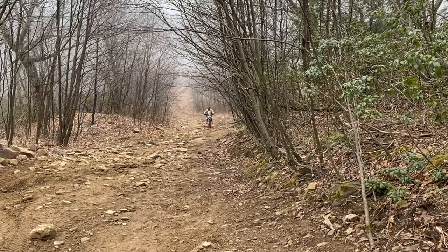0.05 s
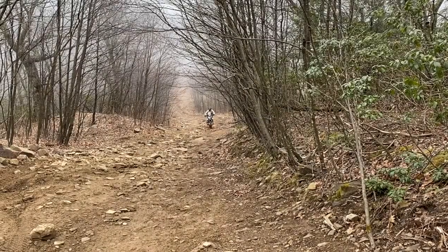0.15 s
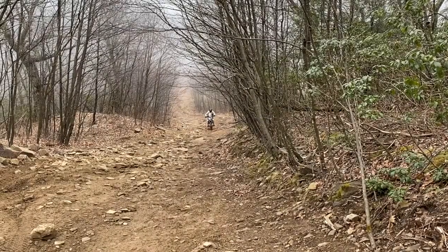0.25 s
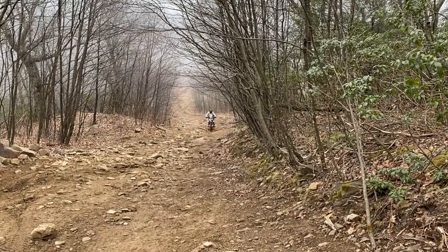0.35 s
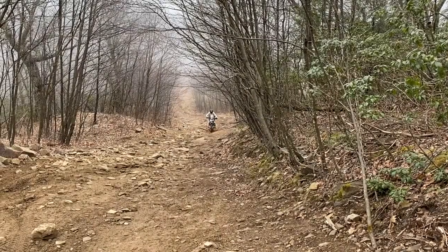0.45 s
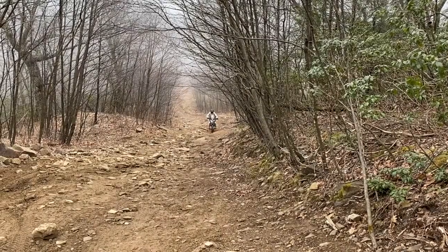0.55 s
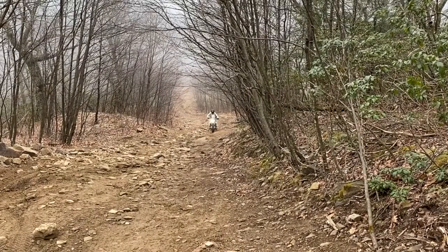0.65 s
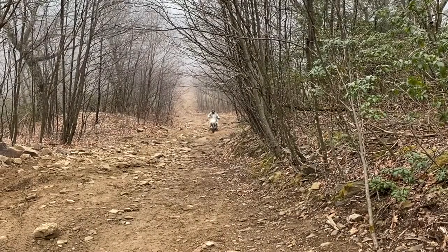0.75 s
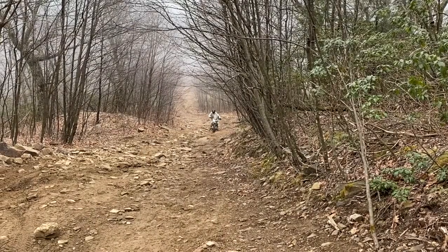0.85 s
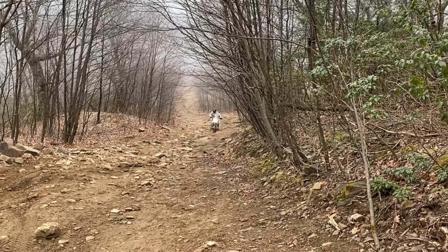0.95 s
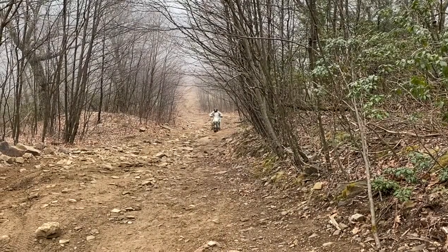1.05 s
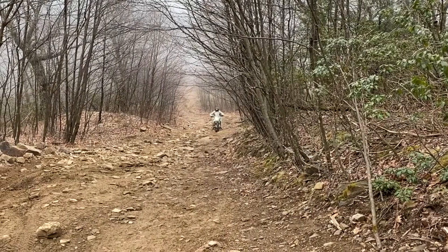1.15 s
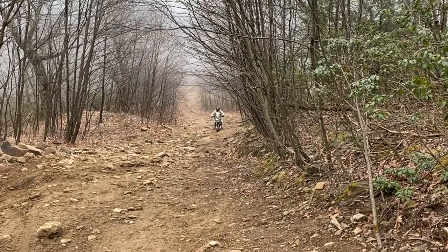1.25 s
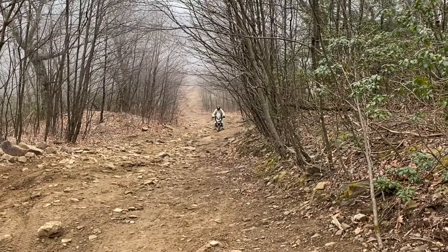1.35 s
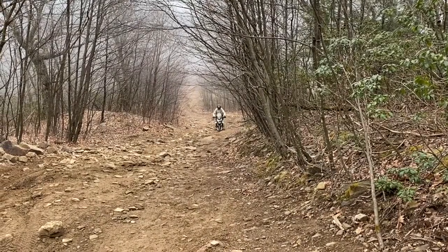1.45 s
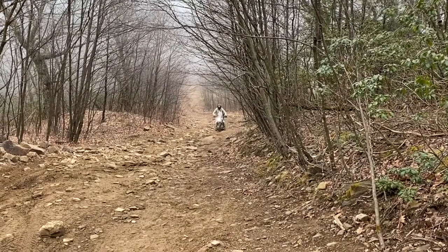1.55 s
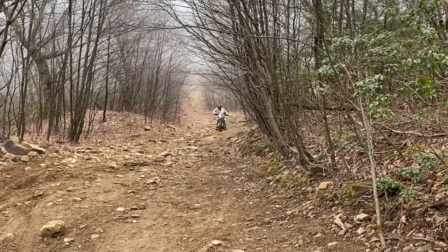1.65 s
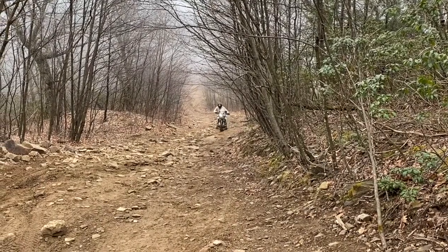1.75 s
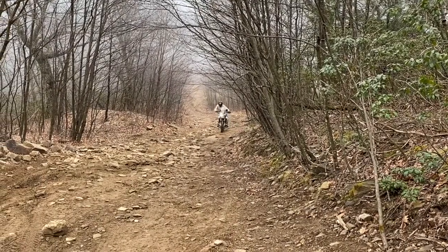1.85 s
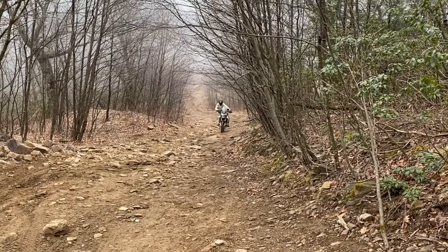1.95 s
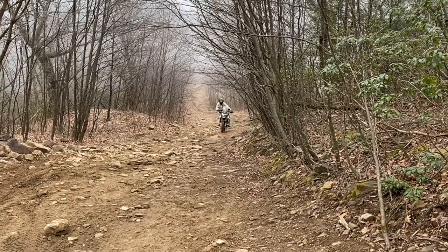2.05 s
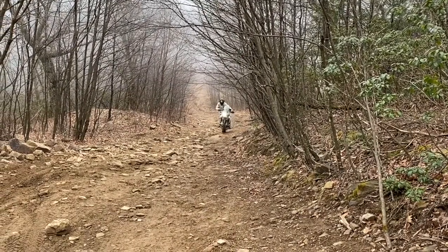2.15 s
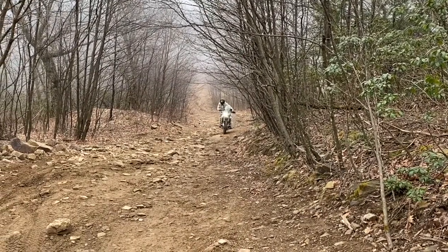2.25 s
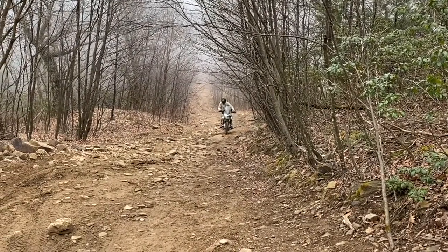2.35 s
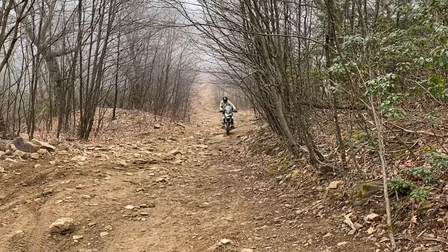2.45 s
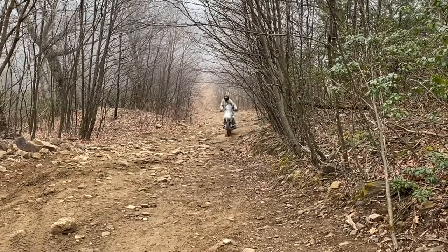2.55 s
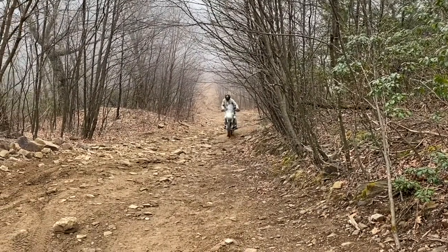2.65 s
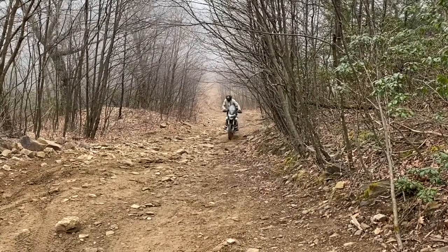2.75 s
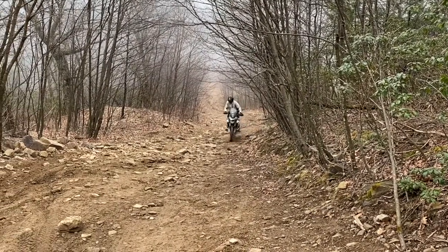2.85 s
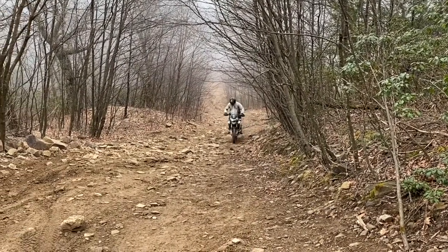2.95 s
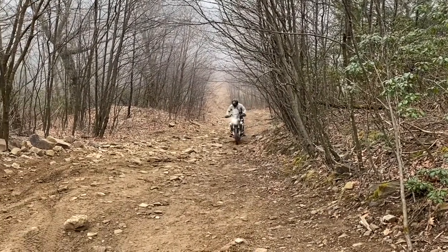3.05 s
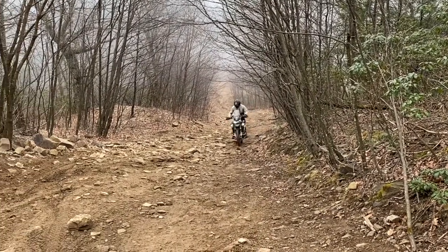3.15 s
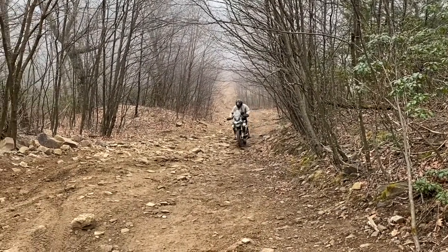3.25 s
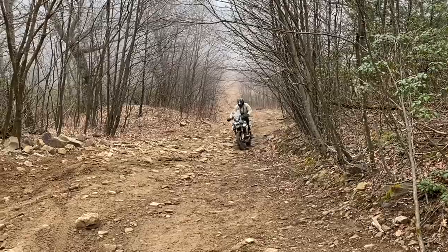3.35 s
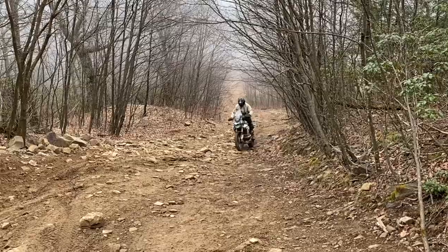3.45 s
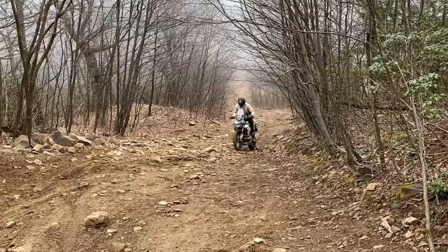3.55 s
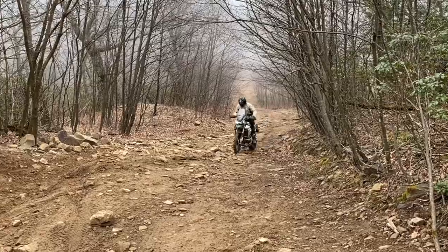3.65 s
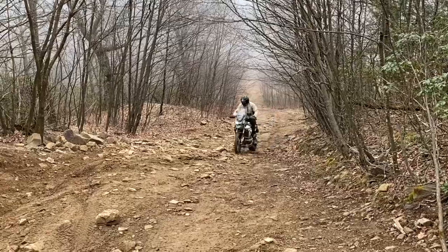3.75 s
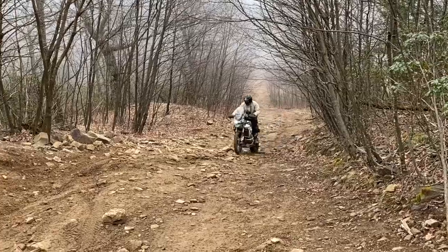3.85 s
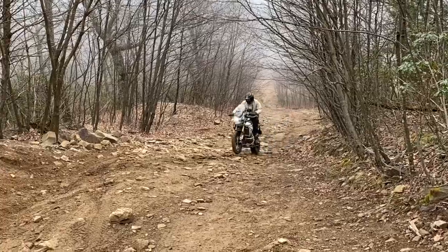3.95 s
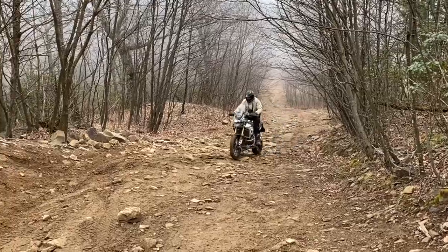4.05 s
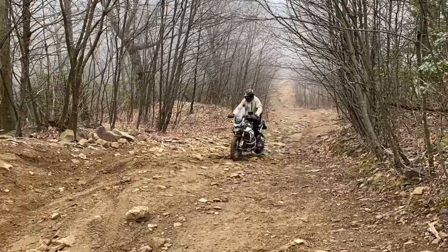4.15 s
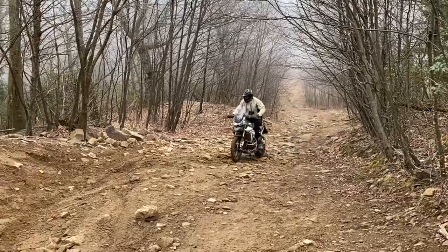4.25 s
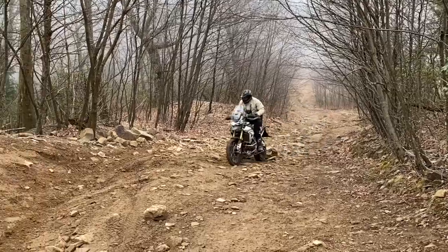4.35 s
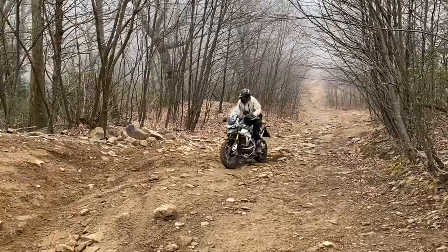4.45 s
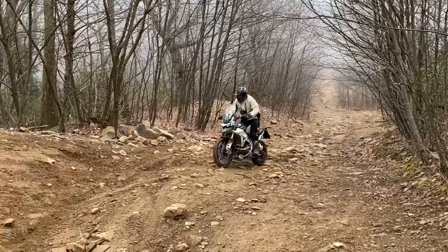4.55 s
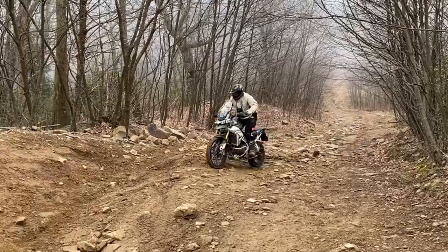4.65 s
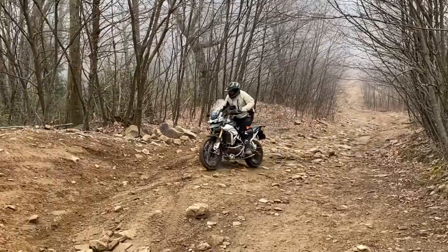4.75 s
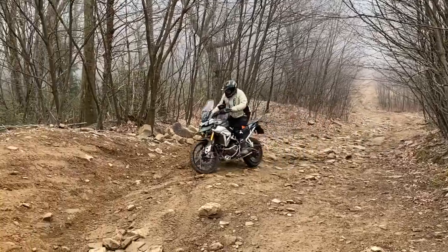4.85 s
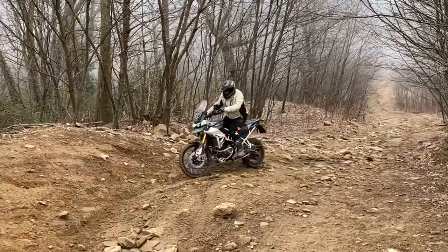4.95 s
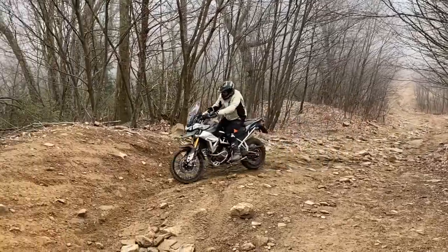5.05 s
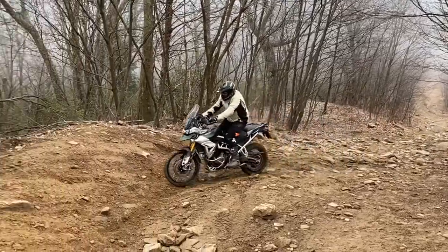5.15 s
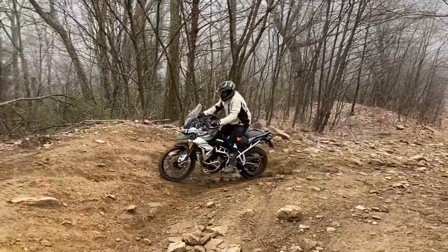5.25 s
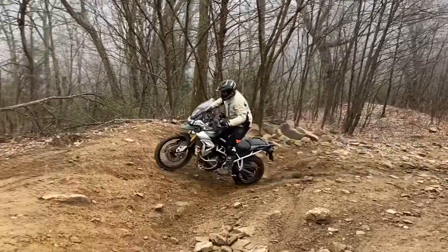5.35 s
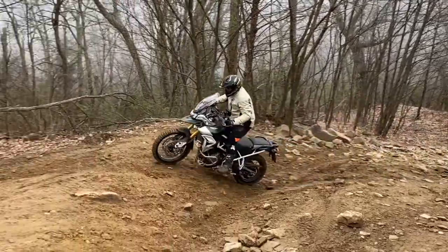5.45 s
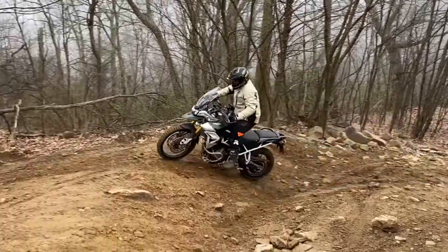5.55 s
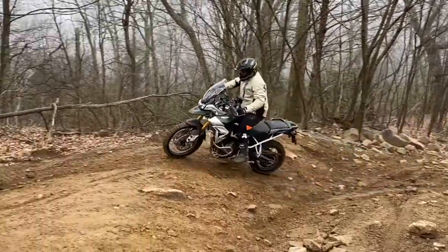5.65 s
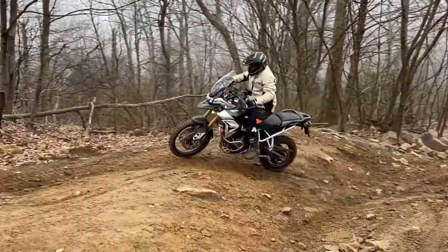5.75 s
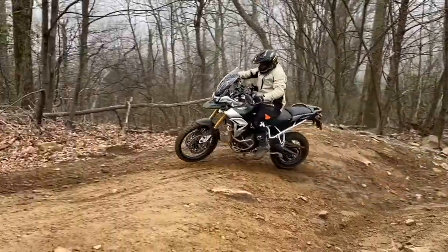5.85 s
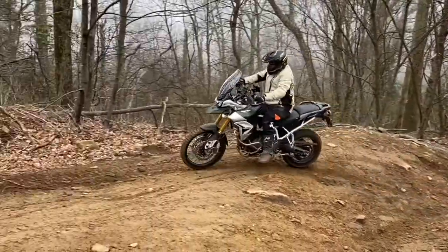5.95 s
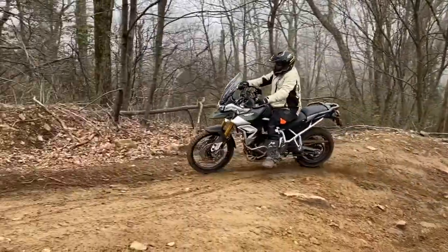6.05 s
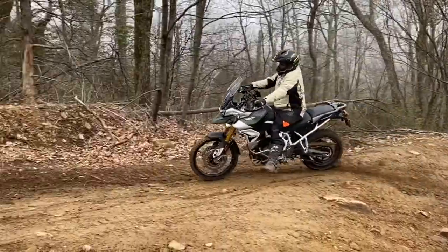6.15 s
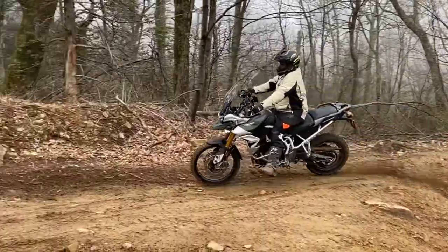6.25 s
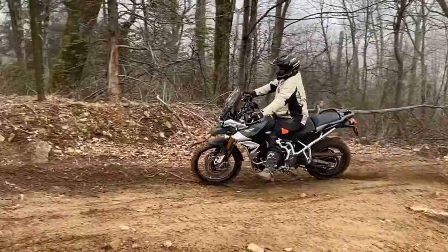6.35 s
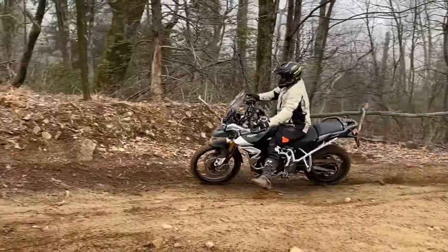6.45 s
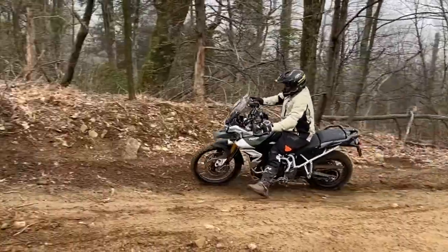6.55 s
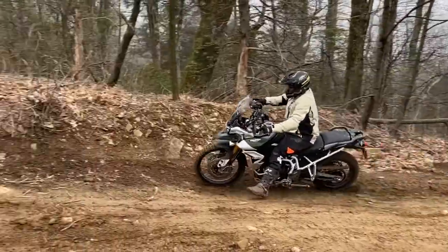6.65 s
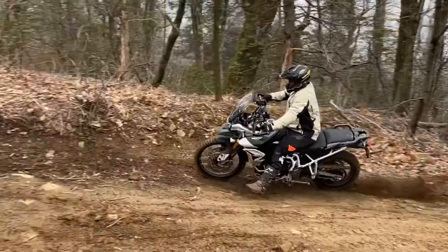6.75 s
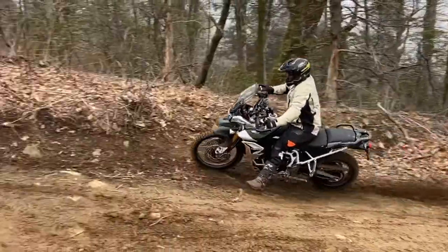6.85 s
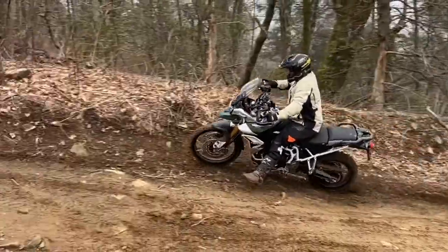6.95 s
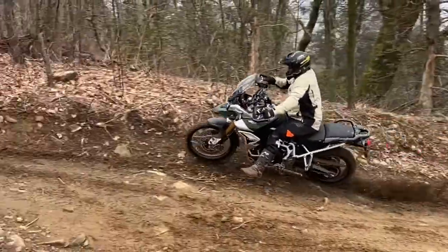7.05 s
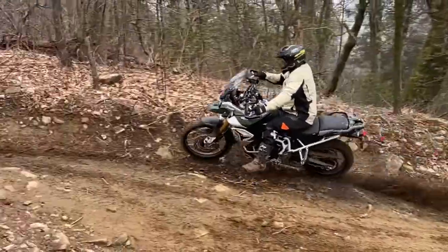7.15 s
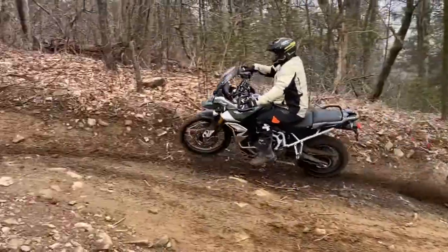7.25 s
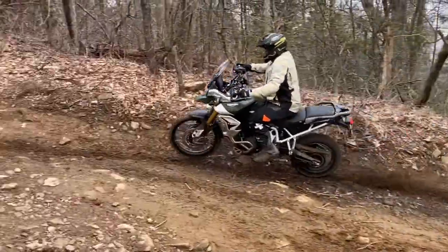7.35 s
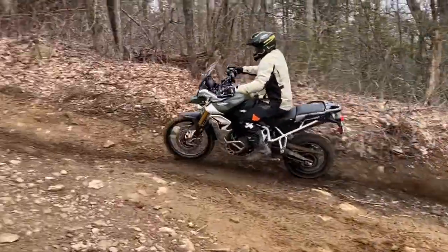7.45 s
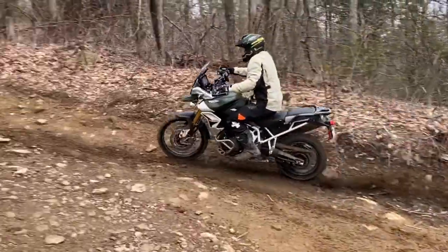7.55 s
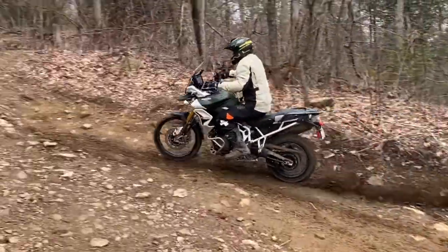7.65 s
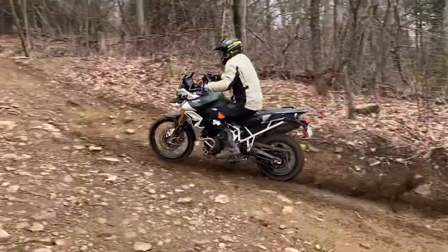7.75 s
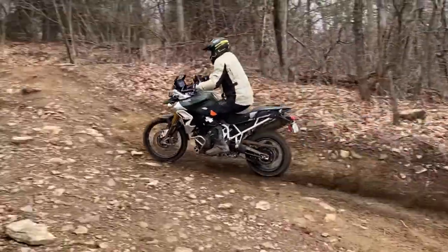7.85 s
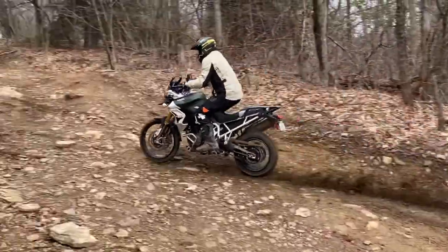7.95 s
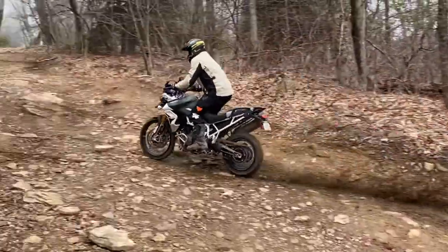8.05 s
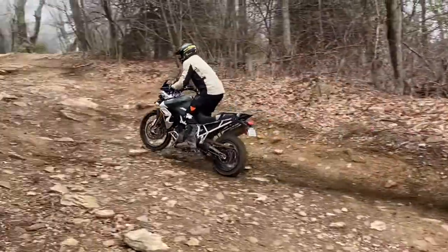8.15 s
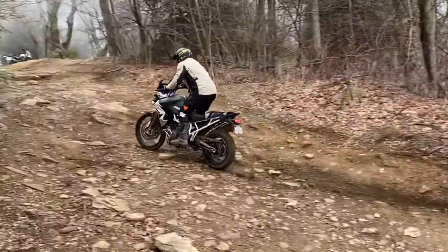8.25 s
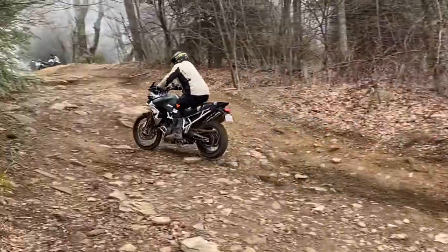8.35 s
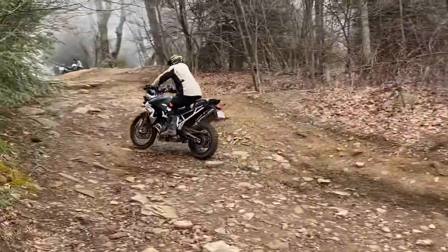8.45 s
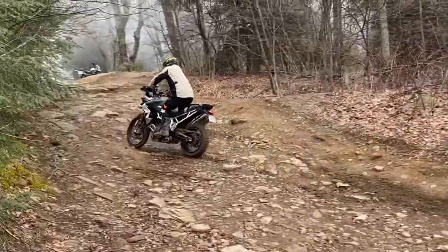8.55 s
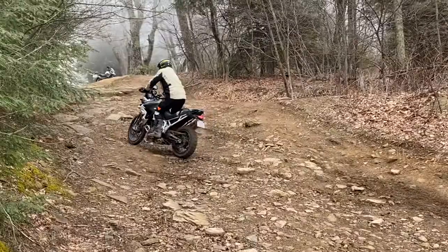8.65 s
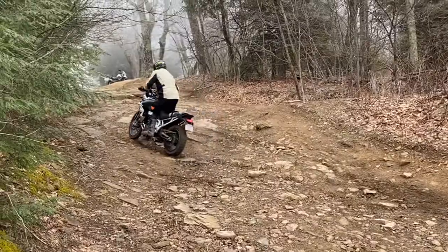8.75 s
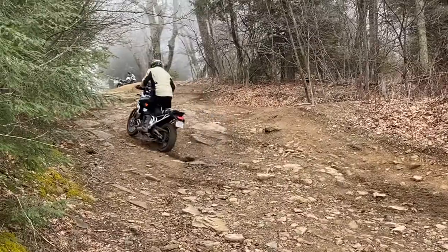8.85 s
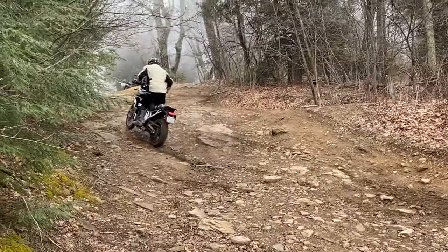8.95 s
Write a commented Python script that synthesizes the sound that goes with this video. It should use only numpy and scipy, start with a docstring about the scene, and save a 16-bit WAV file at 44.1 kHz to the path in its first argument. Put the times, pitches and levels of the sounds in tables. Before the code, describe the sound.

A motorcycle with a throaty, uneven exhaust approaches over rocky ground, throttle blipping constantly, roars past close with its rear wheel slipping, then pulls away.

```python
"""A three-cylinder motorcycle with uneven firing climbs a rocky forest trail towards the listener, turns and pulls away.
The throttle is blipped all the time and the rear wheel slips, so speed and exhaust note keep swinging.
Engine orders are sines; firing pulses and gusts of noise ring the silencer and the tail pipe; bright noise is the hiss.
Stones knock a modal sump guard, gravel spits as short noise bursts, a breathy whine passes and trees echo dully."""
import sys
import numpy as np
from scipy import signal
from scipy.fft import rfft, irfft, next_fast_len
from scipy.io import wavfile
from scipy.ndimage import uniform_filter1d

SR = 44100
rng = np.random.default_rng(int(sys.argv[2]) if len(sys.argv) > 2 else 0)


def wav_out(sig):
    """Save sig, one row per channel (or a flat mono array), as 16-bit PCM at SR to the path in sys.argv[1]."""
    wavfile.write(sys.argv[1], SR, np.round(np.clip(np.atleast_2d(sig).T, -1, 1) * 32767).astype(np.int16))


N = 397341

# firing points as shares of the engine cycle: gaps of 270, 270 and 180 degrees of crank
FIRING = np.array([0, 3, 6]) / 8
# colour of the note as load and heading change:
# t/s, further level of order 2/dB, of order 3/dB, of order 5/dB, of the upper orders re order 5/dB
COLOUR = [(0, -2, 0, 5, 0), (.16, -3, 0, -1, -4), (.32, -1, 0, 7, -2), (.48, -1.5, 4, -3, 0),
          (.7, -2.5, 1, 0, -3), (.85, 0.5, -2, 6, -2), (1, -2, 0, 2, 0), (1.25, -1, 0, 3, -4),
          (1.36, -4, 0, -2, -8), (1.42, -8, -5, -3, 0), (1.47, 0, 0, 0, 4), (1.6, -2, 1, 1, -2),
          (1.75, 0, -2, 5, 0), (1.9, -5, 0, 2, -8), (2.08, -4, 0, -4, -6), (2.2, -3, 0, 1, 0),
          (2.33, 8.5, -3, 6, 0), (2.45, -0.5, 0, 0, 0), (2.7, 1.5, 0, 0, 4), (3.05, -4.5, 0, 0, 0),
          (3.3, 0.5, 0, 0, 0), (3.55, -4, 0, 5, 0), (3.8, -1, 0, 0, 0), (4.1, 0, 0, 3, 0),
          (4.3, -1.5, 0, 0, 0), (4.55, 2.5, -3, 6, 0), (4.7, -0.5, -8, 0, 0), (4.8, 4, -2, -4, -10),
          (4.9, -3, 0, -4, 0), (5.1, -1, 0, 3, 0), (5.3, -2.5, 0, 1, 0), (5.5, 7.5, 1, -2, 0),
          (5.65, 0, -7, 0, -3), (5.8, -11, -8, 6, -13), (5.92, -1, 2, -4, 0), (6.0, 2, -5, 6, 8),
          (6.07, -3, -2, -3, 10), (6.2, -4.5, 1, -3, 10), (6.29, 0, -3, 8, 8), (6.38, -3.5, -6, 2, -2),
          (6.46, -1, 4, 8, 0), (6.52, -1, 0, -1, 9), (6.565, 0, 0, 5, 3), (6.6, -2.5, -2, 3, -2),
          (6.64, -13, -3, 0, -4), (6.675, 12, -6, 6, -8), (6.73, 2, -9, 8, -8), (6.85, -3.5, -6, 10, -8),
          (6.95, 2.5, 0, 1, 0), (7.15, -2, -2, 3, 0), (7.35, -2, 3, 0, -4), (7.55, -2, -2, -2, 3),
          (7.7, -2.5, -3, -1, 4), (7.95, -2, 2, 1, 0), (8.1, -3.5, 0, 0, 0), (8.25, 5.5, -4, 4, 6),
          (8.4, 1, 4, 2, -4), (8.55, 1, -4, 4, -6), (8.68, -1.5, -5, -2, -6), (8.78, 2, 0, 0, 4),
          (8.9, -6, -1, 1, 2), (9, 3.5, 0, 0, 2)]


def from_db(db):
    """Decibels to gain."""
    return 10 ** (np.asarray(db) / 20)


def rms_one(x):
    """Scale to unit rms."""
    return x / np.sqrt(np.mean(x ** 2) + 1e-20)


def in_time(rows):
    """Table columns as one value per sample."""
    s, *columns = np.transpose(rows)
    return [np.interp(np.arange(N) / SR, s, c) for c in columns]


def at_hz(points, hz):
    """Read a spectrum table on a log-frequency axis."""
    table = np.array(points)
    return np.interp(np.log(hz), np.log(table[:, 0]), table[:, 1])


def drift(rate_hz):
    """Slow chance with spread 1: noise through a two-pole lowpass, run at every 40th sample."""
    r = np.exp(-80 * np.pi * rate_hz / SR)
    noise = rng.standard_normal(N // 40 + 2002)
    slow = signal.lfilter([1], [1, -2 * r, r * r], noise)[2000:]   # start-up left out
    return np.interp(np.arange(N) / 40, np.arange(len(slow)), rms_one(slow))


def resonate(x, modes):
    """Parallel resonances (f/Hz, width/Hz, level/dB) with alternating signs."""
    out = 0
    for k, (hz, width_hz, level_db) in enumerate(modes):
        r = np.exp(-np.pi * width_hz / SR)
        b = (1 - r * r) / 2 * np.array([1, 0, -1])
        a = [1, -2 * r * np.cos(2 * np.pi * hz / SR), r * r]
        out = out + (-1) ** k * from_db(level_db) * signal.lfilter(b, a, x + 1e-18)
    return out


def evened(x, seconds):
    """Hold the running rms at 1."""
    return x / np.sqrt(uniform_filter1d(x ** 2, int(seconds * SR)) + 1e-12)


def widen(mid, side, hz):
    """Two capsules hear partly alike noise; how alike depends on frequency."""
    likeness = [(60, 1), (400, 0.92), (1000, 0.79), (2400, 0.68), (6000, 1), (15000, 0.71)]   # f/Hz, left-right likeness (0-1)
    alike = np.clip(at_hz(likeness, hz), 0, 1)
    return np.sqrt(1 + alike) * mid + np.sqrt(1 - alike) * side * [[1], [-1]]


def riding():
    """Throttle blips drive cycle rate, load 0-1, note and tilt, coasting note, surge of gas flow and further bark."""
    # throttle blips: opens t/s, pull ends t/s, shuts t/s, cycle rate before f/Hz, cycle rate after the pull f/Hz,
    # exhaust note level/dB, its tilt/dB per octave, surge of gas flow/dB, further bark/dB,
    # deep note when coasting afterwards level/dB
    rows = np.array([(-.1,-.05,-.02,36,42, -33,0,3,3,-33), (.08,.17,.2,33,48, -29,2,6,1,-29),
                     (.42,.5,.54,31,33, -31,0,1,0,-30), (.59,.73,.76,31,48, -27,1,10,1,-28),
                     (.99,1.1,1.12,28,39, -32,2,5,2,-27), (1.39,1.56,1.69,23,54, -23,1,18,0,-27),
                     (2.12,2.22,2.26,20,30.5, -24,1,10,5,-30), (2.37,2.46,2.51,22.5,26.5, -26,2,6,2,-28),
                     (2.51,2.57,2.7,26.5,37, -22,2,11,3,-28), (2.7,2.8,2.84,35,41, -23,2,9,3,-25),
                     (2.92,3.03,3.04,32,42, -18,-1,8,4,-25), (3.16,3.28,3.32,22,29, -21,1,5,2,-23),
                     (3.32,3.43,3.5,29,40, -21,1,11,4,-19), (3.7,3.78,3.87,24,31, -20,1,8,4,-25),
                     (3.87,3.94,4.0,28.5,42, -18,0,11,4,-26), (4.0,4.06,4.07,34,39, -23,3,9,6,-18),
                     (4.135,4.28,4.36,23,40, -19,0,11,3,-27), (4.36,4.5,4.52,32,27, -22,1,7,3,-25),
                     (4.62,4.71,4.72,21,28, -20,0,8,2,-20), (4.91,4.99,5.05,18,26, -18,0,9,2,-23),
                     (5.12,5.2,5.41,20.5,28.5, -16,0,11,0,-17), (5.59,5.64,5.76,18,22, -15,1,8,-3,-28),
                     (5.76,5.93,5.97,21,34, -15,-3,11,1,-22), (6.03,6.17,6.23,28,35, -15,-5,10,2,-25),
                     (6.31,6.36,6.39,31,35, -16,-2,8,3,-22), (6.47,6.655,6.67,29,76, -12,-3,19,-2,-21),
                     (6.85,6.95,7.0,51,59, -18,-9,11,-2,-22), (7.0,7.15,7.18,52,42, -19,-7,10,-2,-20),
                     (7.18,7.3,7.32,41,51, -15,-7,11,0,-20), (7.45,7.53,7.6,33,39, -15,-6,11,-2,-18),
                     (7.6,7.66,7.83,41,48.5, -14,-4,12.5,-2,-22), (7.83,7.97,8.09,40,47, -17,-4,12,-2,-24),
                     (8.09,8.19,8.24,39,34.5, -22,-2,6,4,-23), (8.48,8.6,8.65,18,21, -27,4,2,0,-26),
                     (8.65,8.75,8.82,21,31, -17,0,11,5,-22), (8.82,8.95,8.98,27,29, -15,0,9,0,-22),
                     (9.1,9.2,9.21,20,35, -20,0,5,0,-22)])
    joined_s = .035   # a shorter gap between blips keeps the throttle open and the load on
    held_sag_per_s, coast_s = 15, .15   # Hz lost per s while held; time constant of the glide after shutting
    open_s, shut_s_long, shut_early_s = 0.029, 0.081, 0.038   # load comes, goes, and starts to go this early
    surge_start, surge_start_db = 0.95, 5.5   # largest share and dB there at once; a bigger surge swells on
    surge_tops = 0.69   # share of the pull after which the surge is full
    surge_fall_db_per_s = 27   # after shutting
    surge_sag_db_per_oct, note_sag_db_per_oct = 16, 23   # both sink as the speed drops below its value after the pull

    t = np.arange(0, N + 64, 64) / SR   # one control value per 64 samples
    per_s, sag, load, surge_db, more_db = np.zeros((5, len(t)))
    for row, (next_s, next_low) in zip(rows, rows[1:, [0, 3]]):
        s, pulled_s, shut_s, low, pulled, _, _, peak_db, bark_db, _ = row
        joined = next_s - shut_s < joined_s
        u, pull = t - s, pulled_s - s
        shut = max((next_s if joined else shut_s) - s, pull + 1e-3)
        rest = max(next_s - s - shut, 1e-3)

        # speed moves to its value after the pull, glides while held, then glides to where the next blip starts
        end = next_low if joined else pulled - held_sag_per_s * (shut - pull)
        fall = np.exp(-np.clip(u - shut, 0, rest) / coast_s)
        last = np.exp(-rest / coast_s)
        coast = next_low + (end - next_low) * (fall - last) / (1 - last)
        speed = np.where(u < shut, np.interp(u, [0, pull, shut], [low, pulled, end]), coast)
        below_pulled = np.log2(pulled / speed) * (u > pull)   # octaves
        here = (u >= 0) & (t < next_s)
        per_s[here], sag[here] = speed[here], below_pulled[here]

        closing = 1 - (u - shut + (-open_s if joined else shut_early_s)) / shut_s_long
        load = np.maximum(load, np.clip(np.minimum(u / open_s, closing), 0, 1))

        at_once = min(surge_start, surge_start_db / max(peak_db, .1))
        rise_s = [0, min(open_s, pull / 2), max(surge_tops, .6) * pull]
        rise = np.interp(u, rise_s, [0, at_once, 1])
        decay_db = surge_fall_db_per_s * np.maximum(u - shut, 0)
        swell_db = peak_db * rise - surge_sag_db_per_oct * below_pulled - decay_db
        more_db = np.where(swell_db > surge_db, bark_db * swell_db / max(peak_db, .1), more_db)
        surge_db = np.maximum(surge_db, swell_db)

    loaded_db, tilt_db = rows[np.searchsorted(rows[:, 0], t) - 1][:, 5:7].T
    loaded_db = loaded_db - note_sag_db_per_oct * sag
    coasting_db = rows[np.searchsorted(rows[:, 1], t) - 1, 9]
    controls = (per_s, load, loaded_db, tilt_db, coasting_db, surge_db, more_db)
    return [np.interp(np.arange(N) / SR, t, uniform_filter1d(c, size=15)) for c in controls]


def main_orders(per_s, load, loaded_db, tilt_db, coasting_db):
    """Under load all three main orders sound; coasting, mostly the third, and only deep."""
    # order, level under load/dB, level coasting at 40 cycles per s/dB, further level/dB per octave of speed
    order_levels = [(2, 2, -1.5, 5), (3, -2.5, 2, 4.5), (5, 0.5, -2, 2.5)]
    # how the exhaust passes the orders: f/Hz, level/dB
    pipe_response = [(35, -10), (50, -2.5), (70, -1), (100, -1), (140, -2.5), (190, -2.5), (250, -3.5),
                     (380, 6)]
    coasting_cut_hz, coasting_cut_db_per_oct = 110, 22
    change_dip_db = 3   # the note falters while the load comes or goes
    dip_db = change_dip_db * np.sin(np.pi * load) ** 2
    levels_db = []
    for (order, load_db, coast_db, slope_db), colour_db in zip(order_levels, in_time(COLOUR)):
        hz = order * per_s
        cut_db = coasting_cut_db_per_oct * np.maximum(np.log2(hz / coasting_cut_hz), 0)
        pulling_db = loaded_db + load_db
        idle_db = coasting_db + coast_db + slope_db * np.log2(per_s / 40) - cut_db
        mix_db = load * pulling_db + (1 - load) * idle_db
        levels_db.append(mix_db + at_hz(pipe_response, hz) + tilt_db * np.log2(hz / 100) - dip_db + colour_db)
    return levels_db


def exhaust_note(cycle, per_s, levels_db):
    """The engine orders as sines, phased by the firing pattern and the silencer, over a lumpy rumble."""
    # order, level re order 2/dB, further dB per octave below 45 cycles per s (one octave at most)
    weak_orders = [(1, -13, -30), (4, -17.5, 14.5), (6, -21.5, 8), (7, -28, 22)]
    # order, level re order 5 below the silencer's cut/dB
    upper_orders = [(8, -5.5), (11, -12), (13, -27.5)]
    # the silencer's chamber lifts upper orders that cross it: f/Hz, width/octaves, lift/dB
    peak_hz, octaves, peak_db = (338, 1, 4.8)
    # the chamber shifts the orders' phase: f/Hz, shift/degrees
    silencer_turn = [(128, 0), (145, 55), (180, 180), (220, 270), (270, 205), (360, 190)]
    silencer_cut_hz, cut_db_per_oct = 205, 19.1

    orders = dict(zip((2, 3, 5), levels_db))
    for order, rel_db, slope_db in weak_orders:
        orders[order] = levels_db[0] + rel_db + slope_db * np.clip(np.log2(45 / per_s), 0, 1)
    upper_db = in_time(COLOUR)[3]
    for order, rel_db in upper_orders:
        hz = order * per_s
        above = np.maximum(np.log2(hz / silencer_cut_hz), 0)   # octaves past the cut
        lift = np.exp(-(np.log2(hz / peak_hz) / octaves) ** 2)
        orders[order] = levels_db[2] + rel_db - cut_db_per_oct * above + peak_db * lift + upper_db

    out = 0
    for order, level_db in orders.items():
        firing_phase = np.angle(np.exp(-2j * np.pi * order * FIRING).sum())
        phase = firing_phase + np.radians(at_hz(silencer_turn, order * per_s))
        gain = np.sqrt(2) * from_db(level_db + 2.0 * drift(14))
        out = out + gain * np.cos(2 * np.pi * order * cycle + phase)
    rumble = resonate(rng.standard_normal(N), [(77.0, 34, -8.5), (145.0, 51.0, 9.0)])
    return out + from_db(np.max(levels_db, axis=0) - 17) * rms_one(rumble)


def firings(cycle):
    """A unit click at each firing point of the cycle."""
    return sum(np.diff(np.floor(cycle - point), prepend=np.floor(cycle[0] - point)) for point in FIRING)


def puffs(clicks, decay_s, spread_db):
    """Each firing opens a gust of gas of its own strength that dies away."""
    strong = clicks * from_db(spread_db * rng.standard_normal(N))
    gust = signal.lfilter([1], [1, -np.exp(-1 / (decay_s * SR))], strong)
    return gust / uniform_filter1d(gust + 1e-9, SR // 12)


def bark(clicks, level_db):
    """Firing pulses and some turbulence ring in the silencer."""
    silencer = [(213.6, 119, 1), (328.4, 158, -1), (418, 82, -8)]   # silencer resonances: f/Hz, width/Hz, level/dB
    air_db = -7   # turbulence re firing pulses
    pulses = clicks * from_db(2.0 * rng.standard_normal(N))
    air = puffs(clicks, 0.022, 8.1) * rng.standard_normal(N)
    rung = evened(resonate(pulses, silencer), 0.027) + from_db(air_db) * rms_one(resonate(air, silencer))
    highpass = signal.butter(4, 190, "high", fs=SR, output="sos")
    return from_db(level_db) * rms_one(signal.sosfilt(highpass, rung))


def rasp(clicks, load, modes, level_db):
    """Each firing under load knocks the tail pipe's resonances and blows a gust of gas through them."""
    gate = .8 + puffs(clicks, .005, 2.5)
    uneven = clicks * from_db(1.5 * rng.standard_normal(N))
    blows = load * evened(uneven, .1) * from_db(8)
    out = 0
    for mode in modes:
        hz, width_hz, _ = mode
        mid, side = gate * rng.standard_normal((2, N))
        once = resonate(np.array([mid + blows, side]), [mode])
        mid, side = resonate(once, [(hz, width_hz, 0)])   # twice for steep flanks
        out = out + from_db(1.3 * drift(5)) * widen(mid, side, hz)
    return from_db(level_db) * rms_one(out)


def hiss(clicks, level_db, treble_db):
    """Valve gear, chain and thrown dirt: bright noise, throbbing a little with the firings, with fine grit in it."""
    hiss_spectrum = [(900, -9.5), (1800, -2.5), (2500, -3.5), (3600, -5), (4700, -6.5), (6500, -22),
                     (8500, -24.5), (10300, -5), (12200, -58), (14200, -21), (16000, -16.5)]   # f/Hz, relative level/dB per Hz
    path = [(0, 22), (2, 22), (4, 3.4), (5.5, 9.3), (7.5, 2.1), (9, 9.3)]   # listener to bike: t/s, distance/m
    casing = [(2367, 42, -14.5), (2617, 320, -14.5), (3400, 1130, -12.5), (4360, 4100, -13)]   # engine casing rings: f/Hz, width of each of two passes/Hz, level re hiss/dB
    air_db_per_m = -0.725   # loss at 10 kHz, growing with frequency

    grit = (rng.random(N) < 250 / SR) * from_db(0.47 * np.minimum(rng.exponential(1, N), 4))
    grit_tails = signal.lfilter([1], [1, -np.exp(-1 / (0.0032 * SR))], grit)
    gate = 5.7 + puffs(clicks, 0.011, 4.0) + 1.6 * grit_tails
    white = gate * rng.standard_normal((2, 2, N))   # neighbouring bands take turns with two noise pairs
    (metres,) = in_time(path)
    flicker_db = 1.4 * drift(14)   # all bands together
    edges = 900 * 2 ** np.arange(0, 4.5, .4)
    out = 0
    for k, (low, high) in enumerate(zip(edges, edges[1:])):
        band = signal.butter(2, [low, high], "band", fs=SR, output="sos")
        mid, side = signal.sosfilt(band, white[k % 2])
        hz = np.sqrt(low * high)
        air_db = air_db_per_m * metres * (hz / 10000) ** 1.08
        tilt_db = treble_db * np.clip(np.log2(hz / 5000), 0, 1)
        band_db = at_hz(hiss_spectrum, hz) + air_db + tilt_db + flicker_db + 1.9 * drift(5.6)
        out = out + from_db(band_db) * widen(mid, side, hz)
    out = rms_one(out)

    for hz, width_hz, rel_db in casing:
        ring = [(hz, width_hz, 0)]
        mid, side = resonate(resonate(white[0, :, ::-1], ring), ring)   # the bands' noise, reversed in time
        out = out + from_db(rel_db + 2.5 * drift(3)) * rms_one(widen(mid, side, hz))
    return from_db(level_db) * out


def whine():
    """A breathy whine while the bike comes head-on: a narrow band of noise on a wandering pitch."""
    hz, level_db = in_time([(2.1, 2380, -62), (2.2, 2390, -44), (2.32, 2245, -56), (2.45, 2306, -47),
                            (2.55, 2453, -49), (2.7, 2230, -41), (2.85, 2254, -51), (3.0, 2240, -71)])   # t/s, pitch f/Hz, level/dB
    turns = 2 * np.pi * np.cumsum(hz) / SR
    breath = drift(260) * np.cos(turns) + drift(260) * np.sin(turns)
    return from_db(level_db) * from_db(3 * drift(25)) * breath


def knocks():
    """Each stone strikes every mode of the sump guard; brightness tilts the modes up to 1 kHz."""
    # stones on the guard: t/s, relative level/dB, brightness/dB per octave about 700 Hz
    stones = [(4.298, -16, -17), (4.306, -13.5, -6), (4.578, -24, -2), (4.692, -8, -6.5), (4.857, -36, 3),
              (4.871, -22, -6), (4.918, -17, 0), (4.96, -27, 7), (5.079, -24, 10), (5.163, -20, 7),
              (5.193, -16, -2), (5.224, -16.5, 6), (5.273, -21, 19), (5.293, -16, 5), (5.319, -27, 3),
              (5.387, -21, 9), (5.416, -25, 3), (5.541, -24, 22), (5.562, -29, 12), (5.88, -14.5, -16),
              (5.905, -15, -5), (6.012, -23, 12), (6.036, -6.5, -7), (6.053, -4.5, 10.5),
              (6.057, -9, -17.5), (6.066, -17, 14), (6.219, -8, 0.5), (6.231, -17, 4), (6.25, -22, 14),
              (6.348, -26, 20), (6.372, -22.5, 14), (7.093, -15, -7), (7.298, -29, -2), (7.754, -15, -5),
              (7.805, -21, 0), (7.883, -19, 7), (8.13, -25, -15), (8.516, -26, 2), (8.784, -15, -12),
              (8.872, -20, -6), (8.89, -18, -2), (8.954, -31, 3)]
    # ringing modes of the guard: f/Hz, relative level/dB, time to fall by 60 dB/s
    guard = [(285, -4.5, 0.023), (374, 0, 0.042), (577, 21, 0.003), (962, 10, 0.03), (1110, 7, 0.012),
             (1490, 4.5, 0.011), (1790, -3, 0.015)]
    contact_hz = 2700   # stone on metal is a blunt contact: little above this
    s, hit_db, bright_db = np.transpose(stones)
    out, chance = np.zeros(N), rng.standard_normal((len(s), len(guard)))
    for k, (hz, level_db, t60) in enumerate(guard):
        tilt_db = bright_db * np.log2(min(hz, 1000) / 700)
        strike_db = hit_db + level_db - 10 + tilt_db + 2.0 * chance[:, k]
        clicks = np.zeros(N)
        clicks[(s * SR).astype(int)] = (-1) ** k * from_db(strike_db)
        r, w = from_db(-60 / (t60 * SR)), 2 * np.pi * hz / SR
        out += signal.lfilter([0, np.sin(w)], [1, -2 * r * np.cos(w), r * r], clicks + 1e-18)
    return signal.sosfilt(signal.butter(2, contact_hz, fs=SR, output="sos"), out)


def gravel():
    """A short crunch of noise with a weaker, longer tail, a broad colour for each stone."""
    spits = [(2.564, -32, 2820), (2.877, -28, 2995), (2.8884, -29, 3570), (2.9, -24.5, 3600),
             (3.105, -30, 3032), (3.5728, -23, 3200), (3.731, -31, 2500), (3.9712, -17.5, 2870),
             (4.0075, -30, 3020), (4.0296, -20, 3094), (4.632, -29, 3480), (4.682, -25.5, 3530),
             (4.7205, -21, 3180), (4.759, -19, 2640), (4.9605, -30, 4130), (5.044, -33, 3000),
             (5.417, -22, 3280), (5.4382, -15, 2660), (5.5406, -32, 2660), (5.611, -23, 2669),
             (6.467, -16.5, 2497), (7.187, -25, 4177), (7.41, -17, 5430), (7.608, -12.5, 4400),
             (7.933, -20, 3670), (8.237, -20.5, 3060), (8.383, -24.5, 2760), (8.392, -19.5, 1500),
             (8.411, -20, 3640), (8.543, -20.5, 2300), (8.58, -29, 3780), (8.631, -23, 2600),
             (8.716, -22, 2526), (8.738, -19.5, 3100), (8.766, -23.5, 3550), (8.837, -14, 2500),
             (8.926, -23.5, 1890)]   # t/s, relative level/dB, centre f/Hz
    out, t = np.zeros((2, N + 2000)), np.arange(2000) / SR
    crunch, tail = np.exp(-t / 0.0032), 0.15 * np.exp(-t / 0.025)
    shape = (1 - np.exp(-t / 0.001)) * (crunch + tail)
    for s, level_db, hz in spits:
        mid, side = rng.standard_normal((2, 2000)) * shape
        burst = resonate(widen(mid, side, hz), [(hz, 2000, 0), (9500, 4000, -20)])
        start = int(s * SR)
        out[:, start:start + 2000] += from_db(level_db - 16) * rms_one(burst)
    return out[:, :N]


def trees(x):
    """A few dull echoes from bank and trunks, other ones on each side."""
    dull, out = signal.lfilter([.2], [1, -.8], x), np.zeros((2, N))
    lags = (rng.uniform(0.004, 0.0197, 8) * SR).astype(int)
    for k, lag in enumerate(lags):
        out[k % 2, lag:] += dull[:-lag] * (-1) ** (k // 2)
    return out


def scene():
    """The motorcycle and the ground under it: engine controls shape the exhaust and hiss, and the layers add up."""
    # base levels of each layer over time, before the throttle surge is added:
    # t/s, bark/dB, low rasp/dB, high rasp/dB, hiss/dB, further treble of the hiss/dB
    base_levels = [(0, -42.5, -51, -60, -47.5, 0), (1.2, -45.5, -54, -66, -50.5, -5),
                   (1.46, -48, -55, -71, -49.5, 1), (1.6, -41, -48.5, -56.5, -48, 6),
                   (1.72, -46, -48, -56.5, -47, 0), (1.85, -48, -48, -50, -47, 0),
                   (2.05, -53, -55, -65, -51.5, -2), (2.5, -43.5, -50, -57, -45.5, 4),
                   (3, -39.5, -43.5, -56, -41.5, 0.5), (3.5, -37, -42.5, -59, -42, 2.5),
                   (4, -35, -40.5, -50, -40, 2), (4.45, -33.5, -40.5, -49, -39.5, -1),
                   (4.9, -40, -42, -50, -40.5, 0.5), (5.25, -37.5, -36.5, -48, -37, 4),
                   (5.6, -41, -39, -47, -38.5, -0.5), (5.88, -34.5, -33.5, -45, -37, 5.5),
                   (6.03, -34, -32, -36.5, -33, 4), (6.18, -32.5, -31.5, -37.5, -37.5, 3.5),
                   (6.3, -29.5, -35.5, -37, -33.5, 1.5), (6.42, -32, -35.5, -42, -37, 3.5),
                   (6.52, -22.5, -29, -33.5, -29.5, 1), (6.66, -38.5, -31, -38, -34.5, 2.5),
                   (6.83, -36, -35.5, -45, -36, -1.5), (7, -31, -29, -37.5, -33.5, 3),
                   (7.4, -38, -29.5, -39.5, -34.5, 0.5), (7.55, -35.5, -32.5, -39, -34, -1),
                   (7.7, -31, -28.5, -37.5, -32, 1.5), (8, -31.5, -34.5, -42, -36, 1),
                   (8.15, -35, -37, -49, -36, 1), (8.3, -36, -35.5, -41, -39, 3),
                   (8.48, -50, -43, -44, -44, 3), (8.66, -40.5, -42.5, -49, -43, -3),
                   (8.76, -40.5, -37.5, -52, -39, 4), (9, -37.5, -41.5, -49, -44.5, 3.5)]
    # how far bark, low rasp, high rasp and hiss follow the surge (share of its dB)
    surge_shares = (0.81, 0.62, 1.11, 0.64)
    # tail pipe resonances: f/Hz, width of each of two passes/Hz, relative level/dB
    low_modes = [(421, 280, -1.5), (585.5, 102, -1.5), (764, 420, -1), (845.4, 59, -6), (1040, 280, -11.5)]
    high_modes = [(1420, 440, 2), (1506, 72, 4), (1625, 88, 4.5), (1728, 114, 5), (1870, 260, -7.5)]
    treble_lag = 0.12   # the treble of the hiss follows the surge less

    per_s, *note, surge_db, more_db = riding()
    load = note[0]
    *base_db, treble_db = in_time(base_levels)
    bark_db, low_db, high_db, hiss_db = (db + share * surge_db for db, share in zip(base_db, surge_shares))
    orders_db = main_orders(per_s, *note)
    cycle = np.cumsum(per_s) / SR + .005 * drift(12)   # the crank speed wavers
    clicks = firings(cycle)
    low = exhaust_note(cycle, per_s, orders_db) + bark(clicks, bark_db + more_db) + knocks()
    pipe = rasp(clicks, load, low_modes, low_db) + rasp(clicks, load, high_modes, high_db)
    bright = hiss(clicks, hiss_db, treble_db - treble_lag * surge_db)
    return low + from_db(-30.5) * trees(low) + pipe + bright + whine() + gravel()


def record(dry):
    """The two capsules differ in phase and level; deep bass is rolled off, peaks are rounded, the top is cut."""
    capsules = np.array([(200, 0.013, -1), (726, -0.016, 0), (1490, -0.9, -1), (2950, 0.87, 0.7),
                         (4930, -0.79, -1), (7900, -2.13, -0.5), (15100, -0.8, -0.1)])   # f/Hz, left's phase lead/radians, left-right level/dB
    cutoff_hz = 15700
    size = next_fast_len(N + 4096)
    hz = np.maximum(np.arange(size // 2 + 1) * SR / size, 1)
    lead, left_db = (at_hz(capsules[:, [0, k]], hz) for k in (1, 2))
    half = from_db(left_db / 2) * np.exp(.5j * lead)   # each side takes half of the difference
    x = irfft(rfft(dry, size) * [half, 1 / half], size)[:, :N]
    x = signal.sosfilt(signal.butter(3, 40, "high", fs=SR, output="sos"), x)
    rounded = 1.087 * np.tanh(x / 1.195)
    return signal.sosfilt(signal.cheby2(24, 80, cutoff_hz, fs=SR, output="sos"), rounded)


dry = scene()
out = record(dry)
wav_out(out)
```